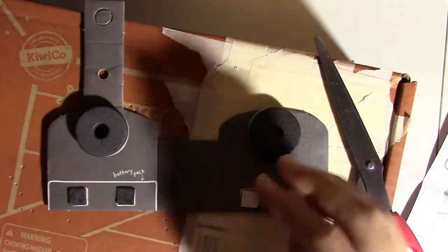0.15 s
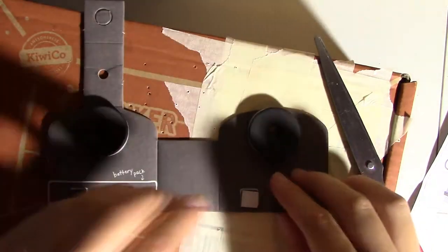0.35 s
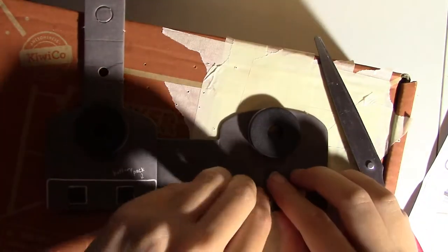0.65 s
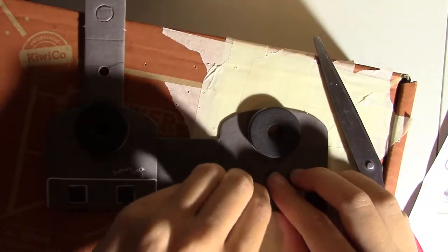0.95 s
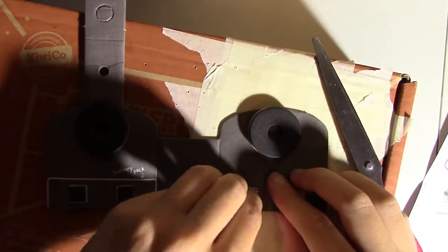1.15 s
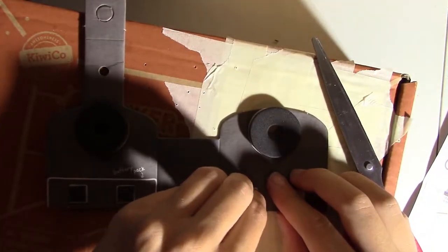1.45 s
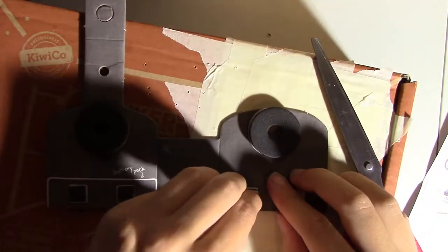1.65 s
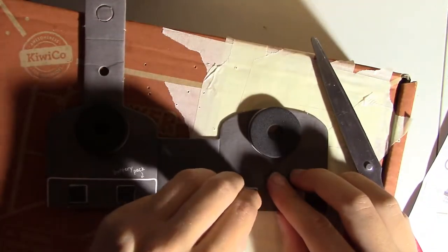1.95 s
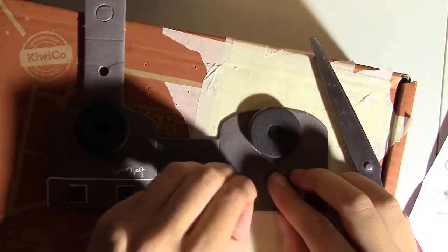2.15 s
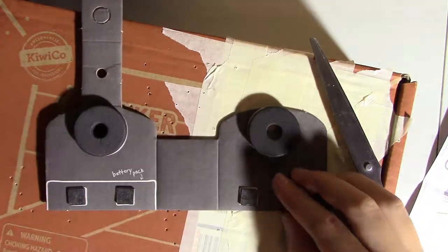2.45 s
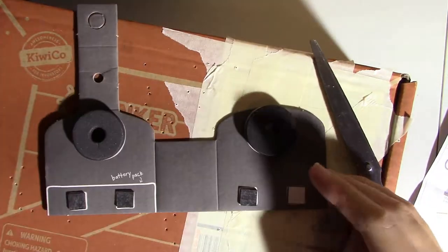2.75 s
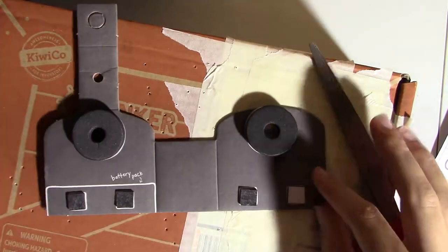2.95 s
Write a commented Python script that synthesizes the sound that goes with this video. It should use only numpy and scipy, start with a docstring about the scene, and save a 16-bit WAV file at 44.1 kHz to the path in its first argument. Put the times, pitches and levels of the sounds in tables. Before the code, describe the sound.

Close paper-peeling snaps, nail scrapes and hollow cardboard taps over a steady fan hum indoors.

```python
"""Fingers pick at the backing paper of a foam square on a cardboard model, close by.
A nail judders along the paper's edge in tiny slips, glue rips in showers of snaps, and paper snaps free.
Finger knocks ring the card's resonances, and strokes of skin rub over paper and card.
Farther off, small things clatter and one rings, as shaped noise with a room-like fade.
A low rumble swells once, and behind it all are steady airy noise and the hum of a fan."""
import sys
import numpy as np
from scipy import signal
from scipy.fft import rfft, irfft
from scipy.io import wavfile

SR = 44100
rng = np.random.default_rng(int(sys.argv[2]) if len(sys.argv) > 2 else 0)


def dump(signal):
    """Clip the signal to [-1, 1] and save it as 16-bit WAV at the path in sys.argv[1]."""
    limited = np.clip(np.atleast_2d(signal).T, -1, 1)
    pcm = np.round(limited * 32767).astype(np.int16)
    wavfile.write(sys.argv[1], SR, pcm)


N = 136710  # length in samples


def amp(db):
    """Turns decibels into a gain."""
    return 10 ** (np.asarray(db) / 20)


def unit(x):
    """Scales a sound to an average (rms) level of one."""
    return x / np.sqrt(np.mean(x ** 2) + 1e-20)


def read(points, hz):
    """Reads between the points of a table, along log frequency."""
    f, value = np.transpose(points)
    return np.interp(np.log(hz + 1), np.log(f + 1), value)


def add(mix, start_s, sound):
    """Adds a sound to the mix at a given time."""
    part = mix[max(round(start_s * SR), 0):][:len(sound)]
    part += sound[:len(part)]


def stereo(mid, side):
    """Makes left and right from a middle and a side signal."""
    return np.array([mid + side, mid - side])


def hump(hz, centre_hz, octaves):
    """Bell-shaped gain around a centre pitch."""
    return np.exp(-.5 * (np.log2((hz + 1) / centre_hz) / octaves) ** 2)


def peaks(hz, modes):
    """Gain of a set of steep-sided resonances."""
    power = 0
    for centre_hz, db, width_hz in modes:
        power = power + amp(db) ** 2 / (1 + ((hz - centre_hz) / width_hz) ** 2 * 2) ** 2
    return np.sqrt(power)


def noise(gain, size):
    """Steady noise with the spectrum gain(Hz)."""
    spectrum = rfft(rng.standard_normal(size)) * gain(np.fft.rfftfreq(size, 1 / SR))
    return unit(irfft(spectrum, size))


def narrow(hz, width_hz, size):
    """A wavering tone: noise in one narrow resonance."""
    return noise(lambda f: 1 / (1 + (2 * (f - hz) / width_hz) ** 2), size)


def click(gain, size=2048):
    """A click of unit energy with the spectrum gain(Hz), its energy as early as possible."""
    log_gain = np.log(np.maximum(gain(abs(np.fft.fftfreq(size, 1 / SR))), 1e-5))
    h = np.fft.ifft(np.exp(np.conj(signal.hilbert(log_gain)))).real  # minimum phase
    return h / np.linalg.norm(h)


GRAIN_SPREAD_DB = 3.5  # how uneven the slips are


def slips(peak_s, rise_s, fall_s, per_s):
    """Tiny slips of uneven size, at random times, under a pressure that swells and fades."""
    t = np.arange(N) / SR - peak_s
    pressure = np.exp(-abs(np.where(t < 0, t / rise_s, t / fall_s)) ** 1.06)
    happens = rng.random(N) < per_s / SR
    direction = rng.choice([-1, 1], N)
    size = amp(GRAIN_SPREAD_DB * np.minimum(rng.exponential(1, N), 2.5))
    return unit(happens * direction * size * pressure) * np.sqrt(np.mean(pressure ** 2))


def rub(drive, surface, surface_db, card_db):
    """Slips sound in the rubbed surface and shake the card; returns both sounds."""
    ring = card(lambda f: hump(f, centre_hz=430, octaves=1.42))
    surface_sound = amp(surface_db) * signal.oaconvolve(drive, surface)[:N]
    card_sound = amp(card_db) * signal.oaconvolve(drive, ring)[:N]
    return np.array([surface_sound, card_sound])


# The nail catches along the paper's edge: peak_s, rise_s, fall_s, edge_db, card_db
NAIL_SCRAPES = [(0.811, 0.0018, 0.0039, -44, -30), (.834, .014, 0.018, -38.5, -31.5),
                (.855, 0.008, 0.0037, -32, -30), (.865, .003, 0.01, -34.5, -36),
                (0.884, 0.0073, 0.011, -44.5, -38)]
# Resonances of nail and paper edge: pitch_hz, level_db, width_hz
EDGE_RESONANCES = [(1101, 15, 84), (1710, 5.5, 150), (2174, 8, 105), (3050, -4, 180), (3520, -1.5, 130),
                   (4400, -6, 310), (5000, 0.5, 270), (5720, -4, 200), (6230, 0, 420), (6900, -1, 330),
                   (8500, -7.5, 480)]
SCRAPE_SLIPS_PER_S = 1600
EDGE_HISS_DB, EDGE_HISS_HZ = -9, 5700  # dry hiss between the resonances, falling above this pitch


def scrape(peak_s, rise_s, fall_s, edge_db, card_db):
    """The nail judders over the stiff edge in tiny slips that make it ring."""
    def edge_gain(f):
        hiss = amp(EDGE_HISS_DB) / (1 + (f / EDGE_HISS_HZ) ** 3)
        return np.hypot(peaks(f, EDGE_RESONANCES), hiss)
    return rub(slips(peak_s, rise_s, fall_s, SCRAPE_SLIPS_PER_S), click(edge_gain), edge_db, card_db)


# Glue rips in showers of tiny snaps: peak_s, rise_s, fall_s, level_db
GLUE_RIPS = [(.853, 0.017, .018, -54.5), (2.16, 0.017, 0.026, -66), (2.24, 0.023, .015, -58),
             (2.284, 0.012, .008, -43.5)]
# Colours of those snaps: centre_hz, spread_octaves, level_db
GLUE_COLOURS = [(3700, 0.25, -3), (6540, 0.15, -1), (9100, 0.12, -6), (13500, .2, -21)]
RIP_SNAPS_PER_S = 900  # for each colour


def rip(peak_s, rise_s, fall_s, db):
    """Threads of glue part one by one, each with one of a few colours."""
    total = np.zeros(N)
    for centre_hz, octaves, colour_db in GLUE_COLOURS:
        threads = slips(peak_s, rise_s, fall_s, RIP_SNAPS_PER_S)
        colour = click(lambda f: hump(f, centre_hz, octaves))
        total += amp(db + colour_db) * signal.oaconvolve(threads, colour)[:N]
    return total


# Snaps of nail, paper and glue: start_s, energy_db, centre_hz, spread_octaves
PAPER_SNAPS = [(.015, -33, 8500, 0.2), (0.041, -35, 5000, 0.73), (0.5928, -14, 3700, 0.76),
               (0.6218, -34, 5000, 0.78), (.624, -35, 4900, 0.37), (0.819, -29, 5940, 0.67),
               (0.836, -23, 5800, 0.26), (0.968, -1.5, 7370, 0.25), (0.9684, -13.5, 11700, 0.18),
               (0.976, -21, 9000, 0.16), (1.02, -30.5, 6500, .25), (1.67, -38.5, 6900, 0.38),
               (1.777, -37, 9000, 0.77), (1.783, -29.5, 7800, 0.44), (1.801, -38, 8000, .6),
               (1.971, -9.5, 3850, 1.23), (2.0906, -19, 5900, 0.66), (2.0919, -14.5, 6500, 0.53),
               (2.1118, -21, 3970, 0.94), (2.13, -30, 8000, 0.52), (2.138, -37, 8500, 0.37),
               (2.149, -27.5, 10400, 0.29), (2.1525, -18, 6400, 0.2), (2.168, -25.5, 9900, 0.28),
               (2.1876, -26.5, 6500, 0.28), (2.2064, -25.5, 7140, 0.42), (2.220, -35, 10600, 0.39),
               (2.231, -39, 9000, .6), (2.236, -36, 8440, 0.58), (2.251, -33, 7500, .4),
               (2.246, -26, 7450, 0.3), (2.258, -19.5, 7900, 0.44), (2.267, -30, 9500, 0.45),
               (2.273, -33, 10000, 0.3), (2.279, -25, 7850, 0.24), (2.296, -37, 12500, 0.2),
               (2.7095, -28, 6900, 0.45), (2.7155, -23, 5930, 0.46), (2.73, -20.5, 3700, 0.15),
               (2.767, -27, 4620, 0.2), (2.772, -20.5, 3580, 0.3), (2.845, -23.5, 3560, 0.28),
               (2.863, -29, 2960, .4)]
# Colour of the stiff paper: pitch_hz, level_db
PAPER_COLOUR = [(100, -24), (1000, -14), (2400, 0), (4200, 0.5), (6900, -1.5), (8600, -5.5), (10300, -5.5),
                (12000, -7.5), (16000, -6)]
SNAP_SKIRT_DB = -15.5  # wide sound under each snap's main pitch
FLUTTER_DB, FLUTTER_T60_S = 0.5, 0.0088  # T60: time to fade by 60 dB


def snap(db, centre_hz, octaves):
    """A sudden release, smeared by a brief flutter of the paper that leaves its colour alone."""
    t = np.arange(SR // 20) / SR
    flutter = rng.standard_normal(len(t)) * np.exp(-np.log(1000) * t / FLUTTER_T60_S)
    release = (t == 0) + amp(FLUTTER_DB) * flutter / np.linalg.norm(flutter)
    spectrum = rfft(release, 2 * len(t))
    drive = irfft(spectrum / abs(spectrum))[:len(t)]  # keep the timing, flatten the colour

    def paper_gain(f):
        skirt = amp(SNAP_SKIRT_DB) / (1 + (f / centre_hz) ** 4)
        return amp(read(PAPER_COLOUR, f)) * (hump(f, centre_hz, octaves) + skirt)
    sound = signal.fftconvolve(drive, click(paper_gain))
    return amp(db) * sound / np.linalg.norm(sound)


# Resonances of the cardboard: pitch_hz, peak_db, t60_s (fade by 60 dB, before any finger damping)
CARD_MODES = [(140, -5, 0.069), (221, 2.5, 0.092), (262, 4.5, 0.097), (343, -4.5, 0.13), (412.4, -1, 0.055),
              (537, -3.5, 0.039), (648, -7, 0.031), (823, -7, 0.035), (1070.5, -3, 0.032),
              (1420, -17.5, 0.022), (1740, -17.5, 0.046), (2280, -12.5, 0.02)]
RADIATION_HZ = 125  # the card radiates little below this


def card(weight):
    """The cardboard's ring: its resonances, driven by a force with the spectrum weight(Hz)."""
    def gain(f):
        power = 0
        for hz, db, t60_s in CARD_MODES:
            detune = 2 * np.pi * (f - hz) * t60_s / np.log(1000)
            power = power + amp(db) ** 2 / (1 + detune ** 2)
        return weight(f) * np.sqrt(power / (1 + (RADIATION_HZ / (f + 1)) ** 8))
    return click(gain, size=8192)


# Finger knocks on the card: start_s, energy_db (before damping), pitch_hz (favoured), spread_octaves
# The row at 0.5977 s is the lingering 250 Hz ring of the knock before it.
CARD_KNOCKS = [(.441, -9.5, 293, 1.44), (0.483, -14, 254, 0.3), (0.5935, 6.5, 184, 1.22),
               (0.5977, -1.5, 251, 0.22), (.742, -32, 710, 0.56), (.822, -10, 376, 0.88),
               (0.852, -4, 415, 0.77), (.864, -9, 1130, 0.52), (0.883, -7, 340, 0.79),
               (0.9678, 1, 990, 2.2), (1.019, -9, 320, 0.99), (1.079, -16.5, 655, 1.16),
               (1.331, -17, 720, 1.3), (1.4, -13.5, 413, 1), (1.558, -21, 610, 0.46),
               (1.9711, 4, 580, 1.33), (2.0919, -2.5, 1060, 0.73), (2.096, -0.5, 300, 0.53),
               (2.1119, -2, 345, 1.3), (2.134, -4.5, 262, 0.36), (2.141, -8.5, 286, 0.8),
               (2.354, -1.5, 166, 1.25), (2.66, -8.5, 764, 0.36), (2.662, 2, 400, 0.29),
               (2.695, -2.5, 333, 0.39), (2.721, -16, 295, 0.61), (2.937, -4, 283, 0.93),
               (2.969, -10.5, 260, 0.91)]
FINGER_DAMPING_S = 0.037  # the resting finger stills the card after a knock


def knock(db, centre_hz, octaves):
    """The favoured pitch and its spread decide which of the card's resonances ring."""
    ring = card(lambda f: hump(f, centre_hz, octaves))
    return amp(db) * ring * np.exp(-(np.arange(len(ring)) / SR / FINGER_DAMPING_S) ** 2)


# Strokes of skin over paper and card: # peak_s, rise_s, fall_s, grit_db, card_db, tilt_db_per_octave,
# slips_per_s # The row at 2.28 s is the paper peeling away as the glue rips.
SKIN_STROKES = [(.09, 0.34, 0.099, -50, -57, -1, 2500), (.47, 0.15, 0.19, -51.5, -46.5, -4.5, 2770),
                (.79, 0.069, 0.025, -56.5, -45, 1.5, 1300), (1.90, 0.21, 0.24, -56.5, -54, -1, 3050),
                (1.947, 0.0077, 0.04, -41, -40.5, -3.5, 3100), (2.131, 0.11, 0.06, -43.5, -42, -1.5, 1870),
                (2.28, 0.016, 0.047, -41.5, -38, 1.5, 1520),
                (2.383, 0.065, 0.054, -43.5, -37.5, -2.5, 2000), (2.56, 0.15, 0.14, -52, -44, -1, 2600),
                (2.731, 0.058, 0.034, -42, -36, -2.5, 1020), (2.804, 0.016, 0.028, -46.5, -39.5, 2, 1700),
                (2.885, 0.066, 0.041, -47.5, -43, -5, 2440), (2.948, 0.055, 0.05, -45, -38, 1.5, 2670),
                (3.098, 0.023, 0.017, -49.5, -37, -3, 2240)]
# Colour of the rubbing: pitch_hz, level_db
GRIT_COLOUR = [(200, 2), (1100, 3.5), (1450, 7), (2200, 4), (2750, -1.5), (3400, -4.5), (3900, -5.5),
               (5000, -7.5), (5600, -9), (6400, -7), (7100, -13.5), (7700, -11), (8500, -13.5),
               (9600, -17.5), (12000, -25), (16000, -35)]


def stroke(peak_s, rise_s, fall_s, grit_db, card_db, tilt_db, slips_per_s):
    """Skin slides, or paper peels, over paper and card in many tiny slips."""
    grit = click(lambda f: amp(read(GRIT_COLOUR, f) + tilt_db * np.log2(1 + f / 1000)))
    return rub(slips(peak_s, rise_s, fall_s, slips_per_s), grit, grit_db, card_db)


RUMBLE_S, RUMBLE_WIDTH_S = 2.365, .06
RUMBLE_DB, RUMBLE_HZ, RUMBLE_OCTAVES = -49, 73, 0.83


def rumble():
    """A soft swell of bass noise as the hand pulls away."""
    swell = np.exp(-((np.arange(N) / SR - RUMBLE_S) / RUMBLE_WIDTH_S) ** 2)
    return amp(RUMBLE_DB) * swell * noise(lambda f: hump(f, RUMBLE_HZ, RUMBLE_OCTAVES), N)


# How fast the room's echoes die: pitch_hz, t60_s (fade by 60 dB)
ROOM_DECAY = [(150, 0.26), (600, 0.34), (2500, 0.36), (7000, 0.2), (11000, 0.25), (15000, 0.16)]


def room_tail():
    """Diffuse reflections: noise in which each band dies at its own speed."""
    hz, t, bands = signal.stft(rng.standard_normal(SR // 2), SR, nperseg=256)
    fade = np.exp(-np.log(1000) * t / read(ROOM_DECAY, hz)[:, None])
    tail = signal.istft(bands * fade, SR, nperseg=256)[1]
    tail *= np.minimum(np.arange(len(tail)) / SR / 0.0015, 1) ** 2  # 1.5 ms soft start
    return tail / np.linalg.norm(tail)


def echoes(x, wet_db, side_db):
    """The room's reflections of a near sound, in stereo."""
    tails = stereo(room_tail(), amp(side_db) * room_tail())
    return amp(wet_db) * signal.fftconvolve(x[None], tails, axes=1)[:, :N]


# Colour of the paper's reflections: pitch_hz, level_db
PAPER_ECHO_COLOUR = [(1000, -1.5), (2200, 2), (4500, 1), (5800, 0.5), (6700, -2.5), (8500, -3),
                     (11000, 3.5), (15000, -2)]
PAPER_ROOM_DB, PAPER_SIDE_DB = -14, -8


def paper_echoes(paper):
    """The paper's reflections, which have a colour of their own."""
    thrown = signal.oaconvolve(paper, click(lambda f: amp(read(PAPER_ECHO_COLOUR, f))))[:N]
    return echoes(thrown, PAPER_ROOM_DB, PAPER_SIDE_DB)


CLUMP_DB, CLUMP_HZ = 2.2, 350  # size and speed of the level swings


def clumps(size):
    """Quick, uneven swings of level that roughen the far clatter and clink."""
    swings = noise(lambda f: 1 / (1 + (f / CLUMP_HZ) ** 4), size)
    return unit(amp(CLUMP_DB * np.clip(swings, -2, 2)))


FAR_RISE_S, DIRECT_T60_S = 0.0024, 0.052  # onset; fade of the direct burst


def far_envelope(t60_s, direct_db):
    """A quick rise, a short direct burst at the onset and the long fall of room sound."""
    t = np.arange(SR // 2) / SR
    direct = amp(direct_db - 60 * t / DIRECT_T60_S)  # direct_db is relative to the long fall
    return np.minimum(t / FAR_RISE_S, 1) * (amp(-60 * t / t60_s) + direct)


# Clatter across the room: start_s, level_db, centre_hz, spread_octaves,
# ring_hz, ring_db, second_ring_hz, second_ring_db (ring levels are relative to level_db)
FAR_CLATTER = [(.065, -44, 2200, 0.9, 2940, -5.5, 1830, -7.5),
               (.200, -54.5, 2620, 0.58, 3330, 1.5, 3870, -4.5),
               (.307, -48, 3360, 0.65, 4400, -8, 5400, -11.5),
               (.398, -44, 2630, 0.93, 5700, -14, 2180, -4.5),
               (.411, -47.5, 2430, 0.59, 3300, -7, 2260, -7),
               (1.9413, -42, 1590, 0.91, 1850, -10, 2900, -26),
               (2.346, -41.5, 1600, 0.85, 1590, -6, 2730, -15),
               (2.371, -46.5, 1750, 0.46, 2880, -6, 2100, -8), (2.715, -49, 2510, 0.93, 2330, -2, 1750, -5),
               (2.731, -55.5, 3700, 0.65, 3700, -10, 4300, -15),
               (2.763, -50.5, 4200, 0.71, 4550, -9, 3320, -4), (2.841, -54, 2980, 0.4, 3020, -5, 3840, -4),
               (3.014, -56, 3800, 0.68, 4470, -11, 3700, -11)]
CLATTER_T60_S, CLATTER_RING_WIDTH_HZ, CLATTER_SIDE_DB = 0.36, 200, -15
CLATTER_SKIRT_DB, CLATTER_TOP_HZ = -26, 9000  # faint wide noise, falling above this pitch


def clatter(db, centre_hz, octaves, ring_hz, ring_db, second_hz, second_db):
    """A gritty far contact with two ringing notes, heard mostly as room sound."""
    envelope = far_envelope(CLATTER_T60_S, direct_db=-6)
    size = len(envelope)

    def body_gain(f):
        return hump(f, centre_hz, octaves) + amp(CLATTER_SKIRT_DB) / (1 + (f / CLATTER_TOP_HZ) ** 2)
    body = noise(body_gain, size) * clumps(size)
    ring = amp(ring_db) * narrow(ring_hz, CLATTER_RING_WIDTH_HZ, size)
    second_ring = amp(second_db) * narrow(second_hz, CLATTER_RING_WIDTH_HZ, size)
    return amp(db) * envelope * (body + ring + second_ring)


# Resonances of something hard bumped farther off: pitch_hz, level_db, width_hz
CLINK_MODES = [(2310, 6, 55), (2360, -2, 120), (2880, -7.5, 200), (3860, -10, 160), (5540, -19, 360),
               (6640, -18.5, 970), (8170, -20, 210)]
CLINK_S, CLINK_DB, CLINK_T60_S = 2.3465, -37, 0.33


def clink():
    """The bumped thing's resonances as noise, roughened and blurred by the room."""
    envelope = far_envelope(CLINK_T60_S, direct_db=-15)
    ring = noise(lambda f: peaks(f, CLINK_MODES), len(envelope))
    return amp(CLINK_DB) * envelope * ring * clumps(len(envelope))


HUM_STEADY = .45  # share of each hum line's power that is a steady tone


def hum(hz, db, width_hz):
    """A steady tone with a wavering skirt of narrow noise."""
    tone = np.sqrt(2) * np.sin(2 * np.pi * (hz * np.arange(N) / SR + rng.random()))
    skirt = narrow(hz, width_hz, N)
    return amp(db) * (np.sqrt(HUM_STEADY) * tone + np.sqrt(1 - HUM_STEADY) * skirt)


# Colour of the room's air: pitch_hz, level_db (relative)
AIR_COLOUR = [(20, -42), (35, -44), (50, -28), (90, -21.5), (118, -10), (150, -11.5), (260, -11.5),
              (350, -12), (540, -8), (680, -16.5), (1050, -20), (1300, -24), (2600, -33), (4300, -40),
              (6600, -43.5), (10000, -50), (16000, -58.5)]
# Hum of the fan: pitch_hz, level_db, width_hz
FAN_HUM = [(115.6, -59, 4.4), (251, -59, 18), (535.8, -48, 2.54), (2684, -73, 6.7)]
AIR_DB, AIR_SIDE_DB, DRIFT_DB = -44.5, -18.5, 0.63  # side is relative to the middle


def fan():
    """Steady air noise with a slight drift, and a few wavering hum lines."""
    mid, side = (noise(lambda f: amp(read(AIR_COLOUR, f)), N) for _ in range(2))
    drift = amp(DRIFT_DB * noise(lambda f: 1 / (1 + (f / 5) ** 2), N))  # slow, mostly below 5 Hz
    air = amp(AIR_DB) * drift * stereo(mid, amp(AIR_SIDE_DB) * side)
    return air + sum(hum(*row) for row in FAN_HUM)


CARD_ROOM_DB, CARD_SIDE_DB = -13.5, -41


def scene():
    """Paper and card close by, clatter and fan behind."""
    scrapes = sum(scrape(*row) for row in NAIL_SCRAPES)
    paper, board = scrapes + sum(stroke(*row) for row in SKIN_STROKES)
    paper = paper + sum(rip(*row) for row in GLUE_RIPS)
    for start_s, *row in PAPER_SNAPS:
        add(paper, start_s, snap(*row))
    for start_s, *row in CARD_KNOCKS:
        add(board, start_s, knock(*row))

    far, far_side = np.zeros((2, N))
    for layer in (far, far_side):  # separate draws for middle and side
        for start_s, *row in FAR_CLATTER:
            add(layer, start_s, clatter(*row))
        add(layer, CLINK_S, clink())

    near = paper + board + rumble()
    room = paper_echoes(paper) + echoes(board, CARD_ROOM_DB, CARD_SIDE_DB)
    return near + room + stereo(far, amp(CLATTER_SIDE_DB) * far_side) + fan()


LOW_CUT_HZ, TOP_HZ = 47, 16000


def record(dry):
    """The recorder's bass cut and upper band limit."""
    low_cut = signal.butter(4, LOW_CUT_HZ, "highpass", fs=SR, output="sos")
    top_cut = signal.firwin(255, TOP_HZ, window=("kaiser", 9), fs=SR)
    return signal.oaconvolve(signal.sosfilt(low_cut, dry), top_cut[None], "same")


dry = scene()
out = record(dry)
dump(out)
```